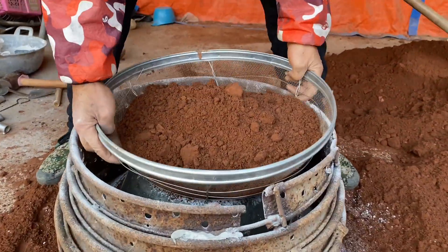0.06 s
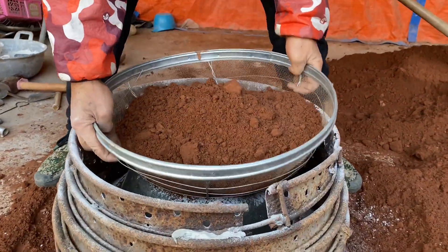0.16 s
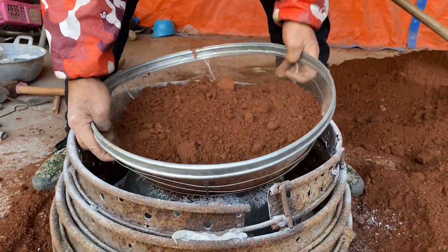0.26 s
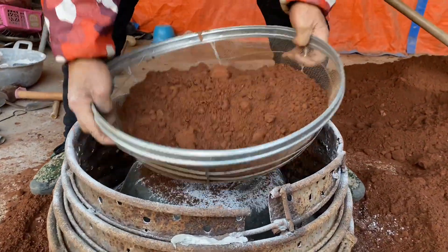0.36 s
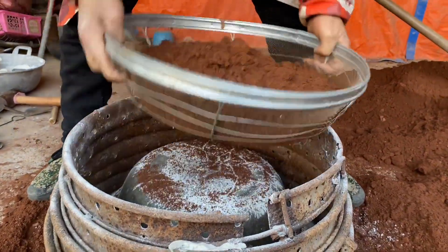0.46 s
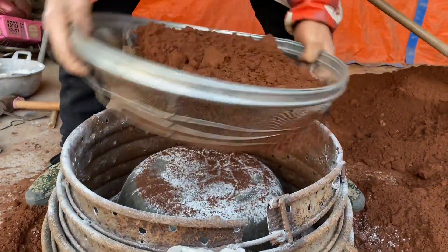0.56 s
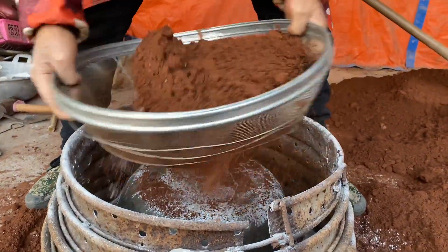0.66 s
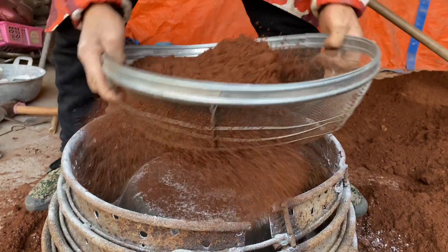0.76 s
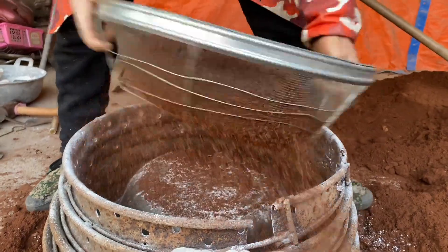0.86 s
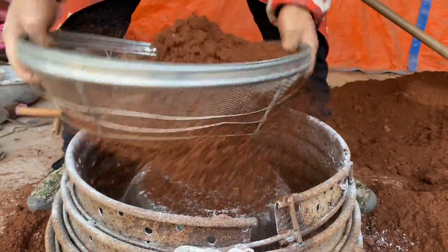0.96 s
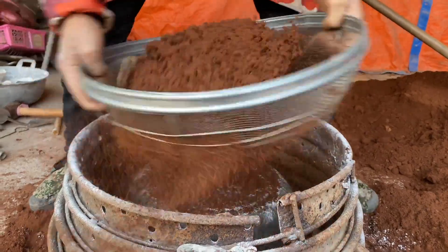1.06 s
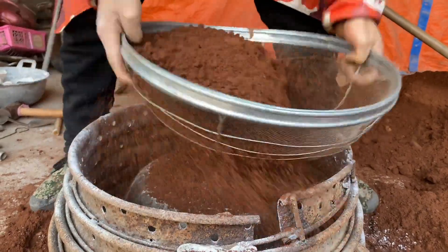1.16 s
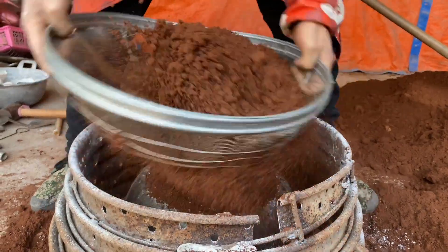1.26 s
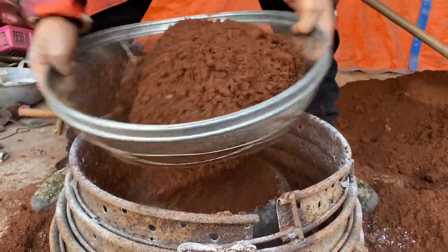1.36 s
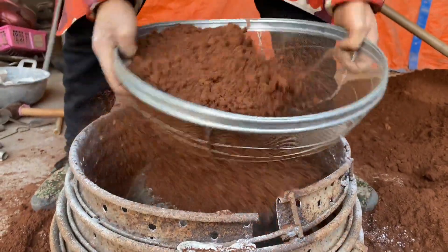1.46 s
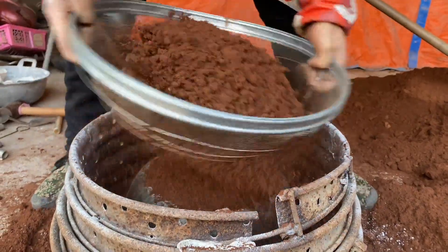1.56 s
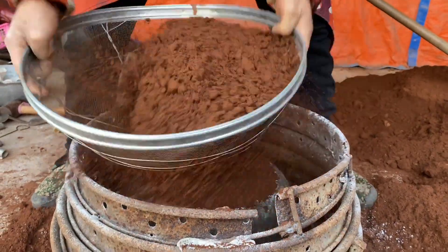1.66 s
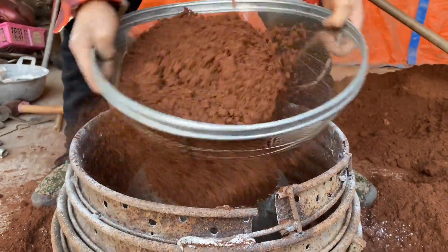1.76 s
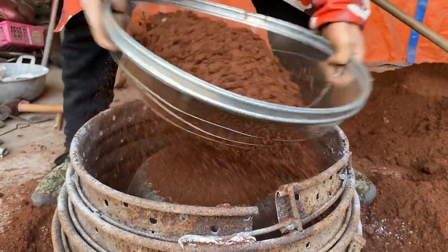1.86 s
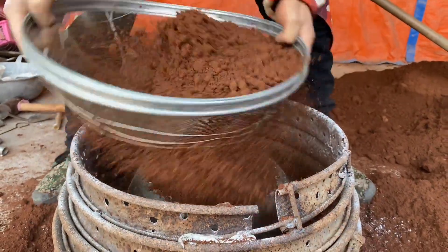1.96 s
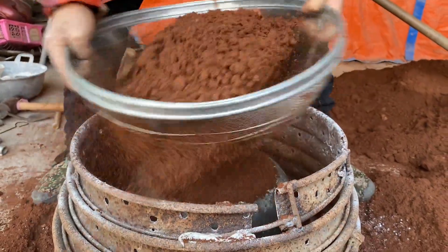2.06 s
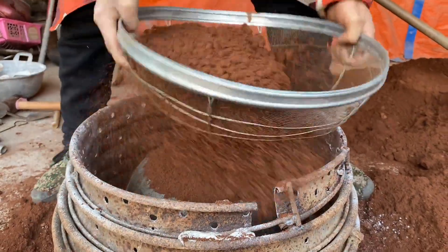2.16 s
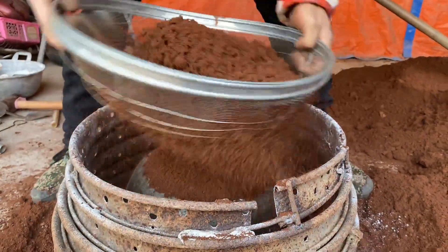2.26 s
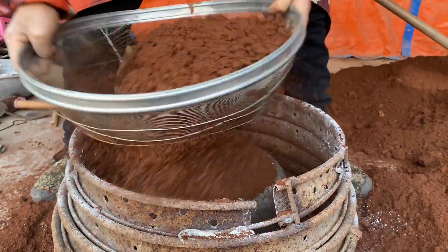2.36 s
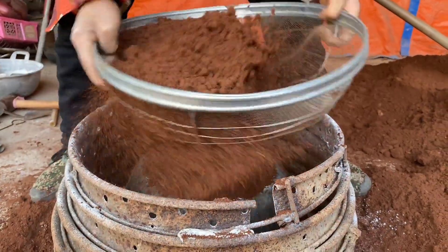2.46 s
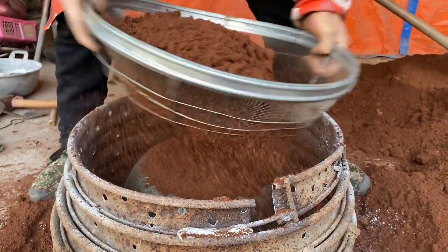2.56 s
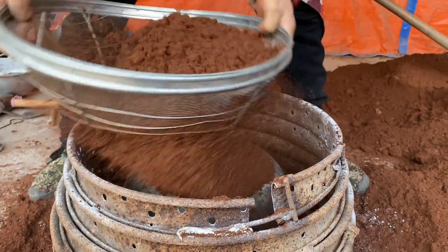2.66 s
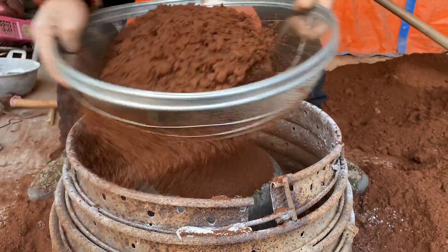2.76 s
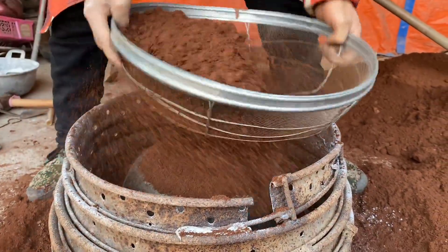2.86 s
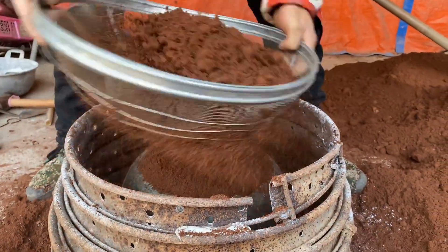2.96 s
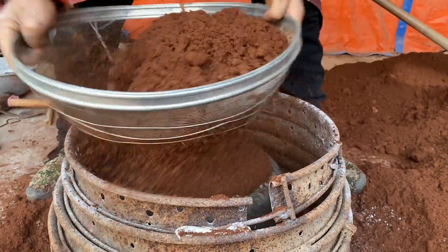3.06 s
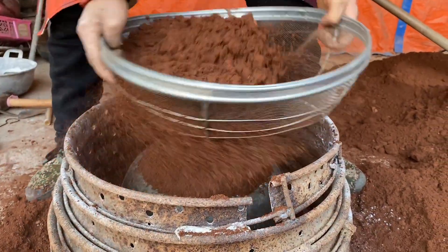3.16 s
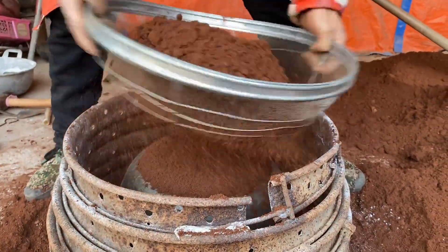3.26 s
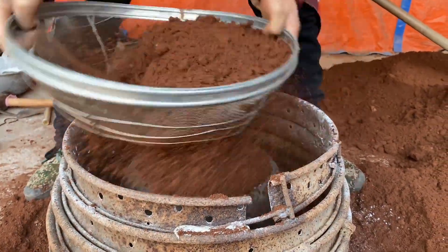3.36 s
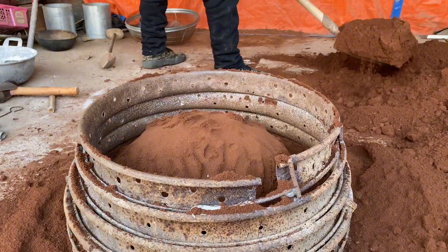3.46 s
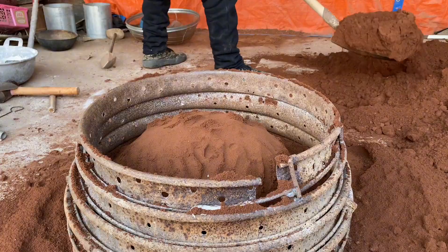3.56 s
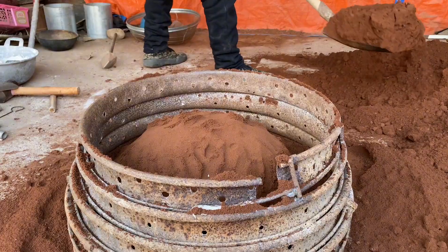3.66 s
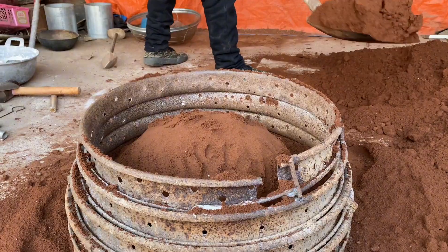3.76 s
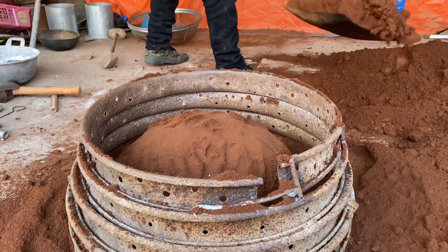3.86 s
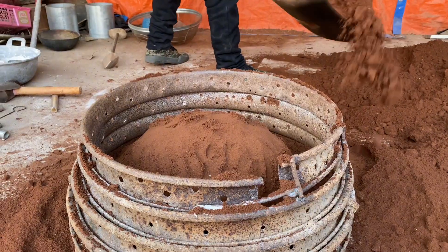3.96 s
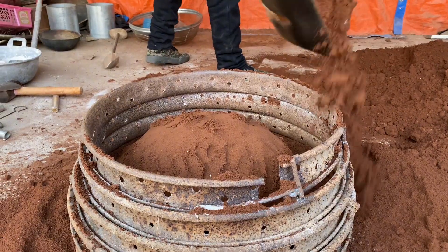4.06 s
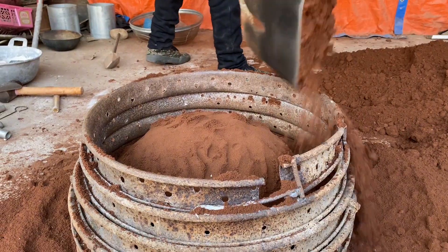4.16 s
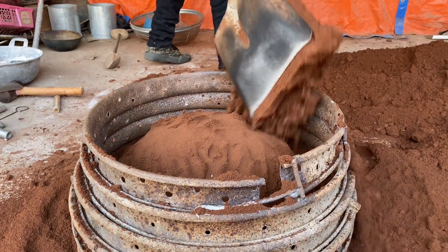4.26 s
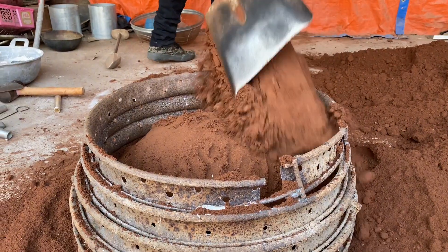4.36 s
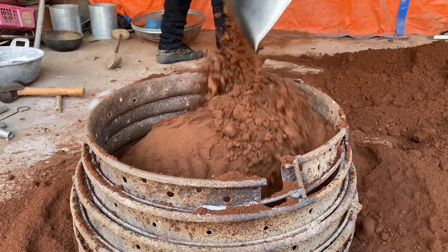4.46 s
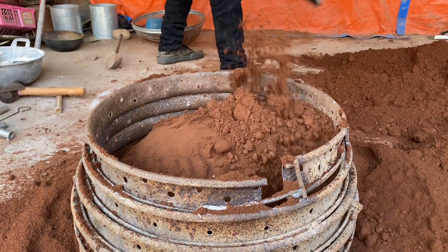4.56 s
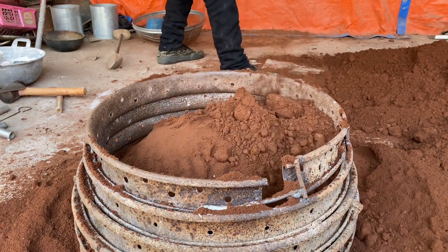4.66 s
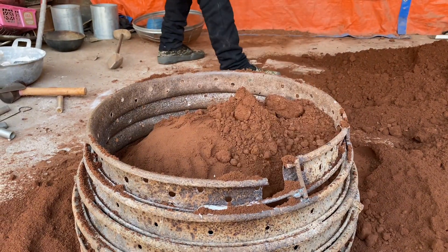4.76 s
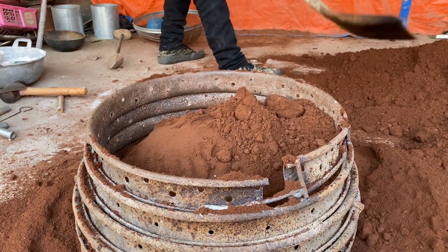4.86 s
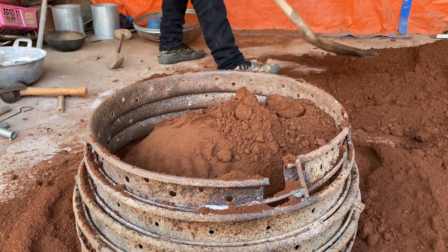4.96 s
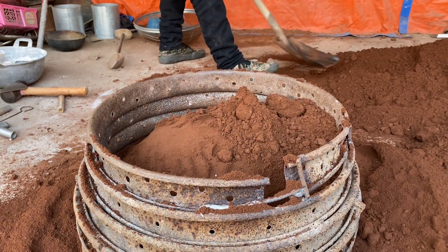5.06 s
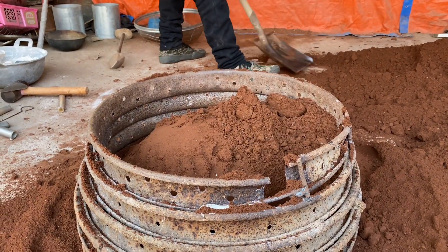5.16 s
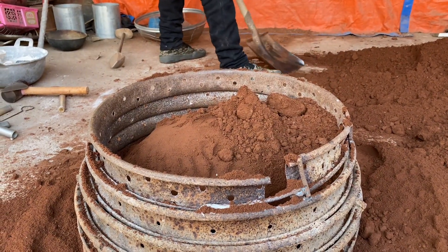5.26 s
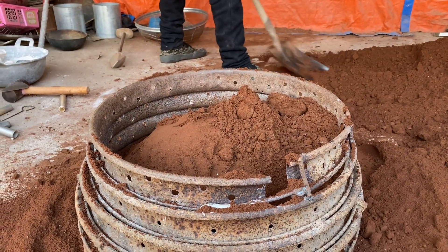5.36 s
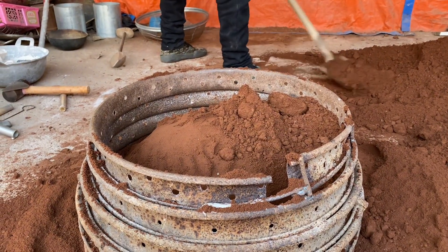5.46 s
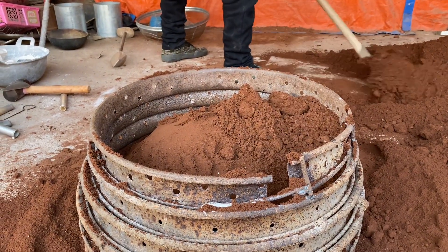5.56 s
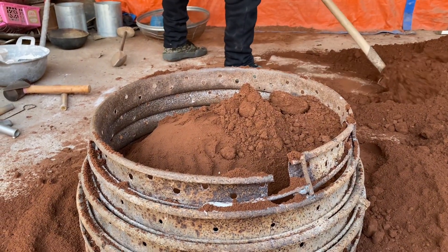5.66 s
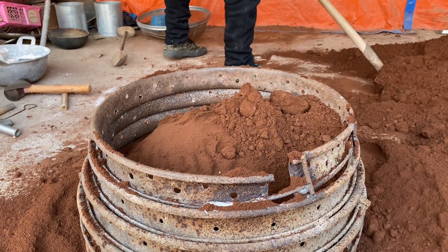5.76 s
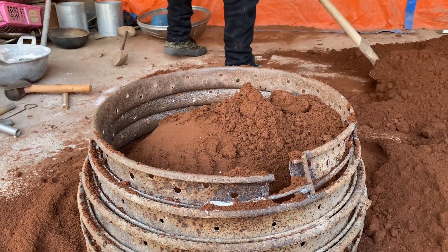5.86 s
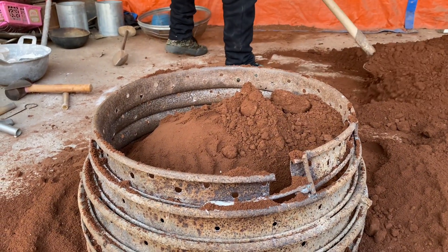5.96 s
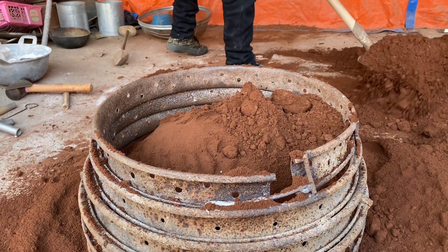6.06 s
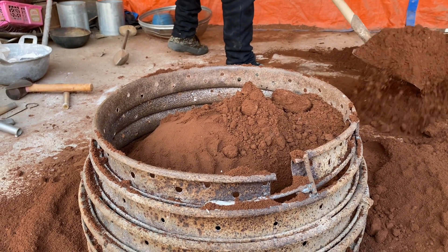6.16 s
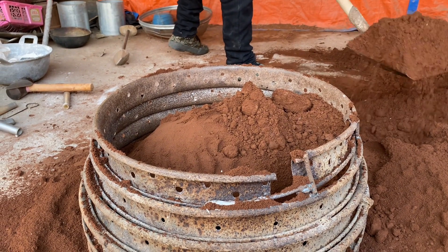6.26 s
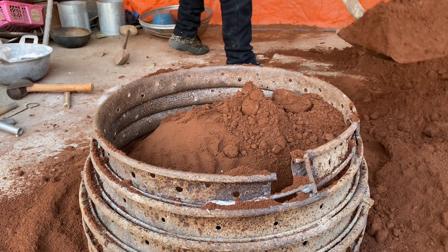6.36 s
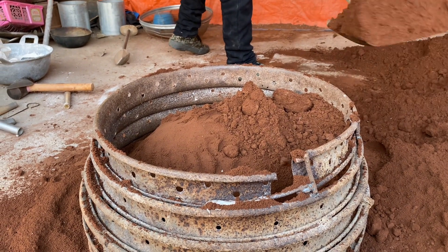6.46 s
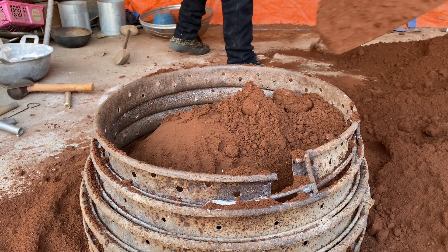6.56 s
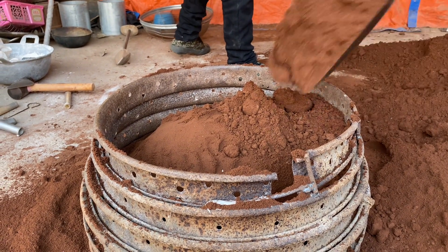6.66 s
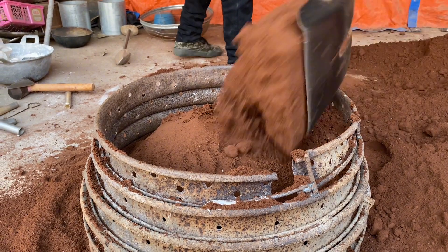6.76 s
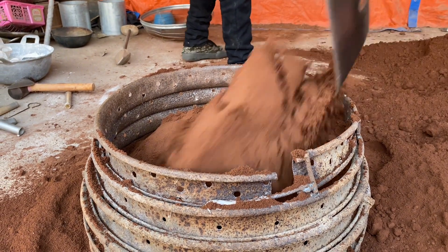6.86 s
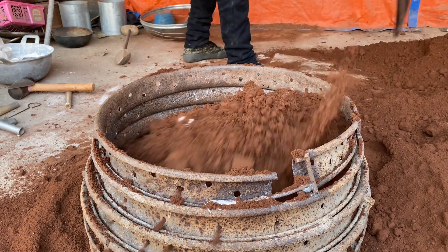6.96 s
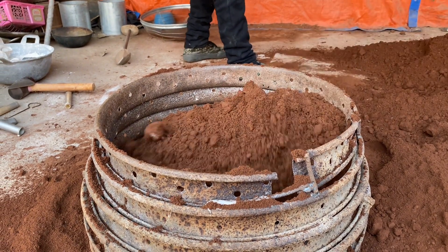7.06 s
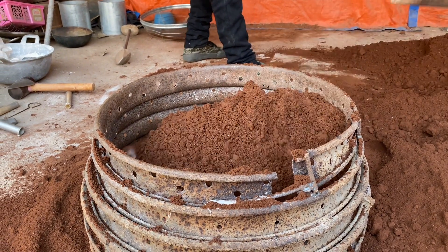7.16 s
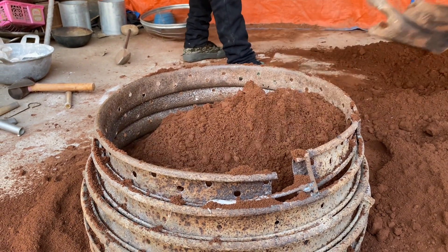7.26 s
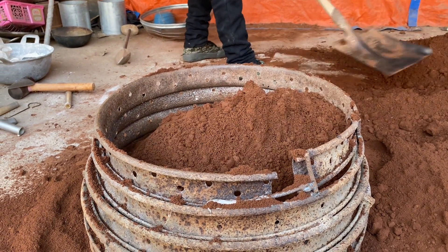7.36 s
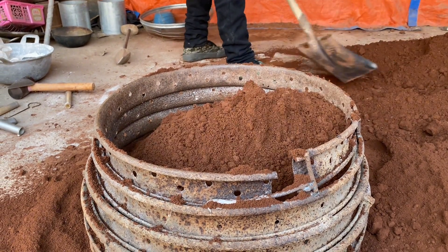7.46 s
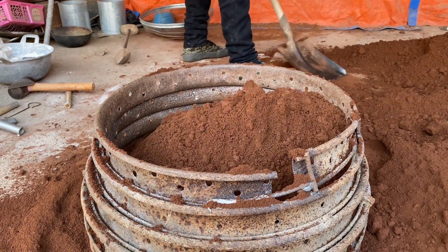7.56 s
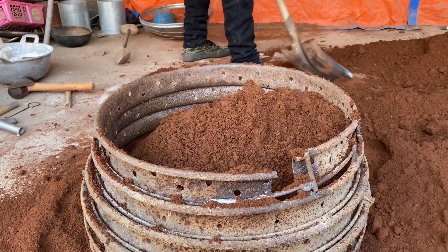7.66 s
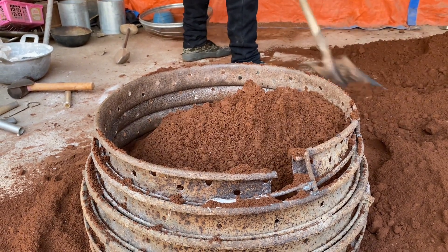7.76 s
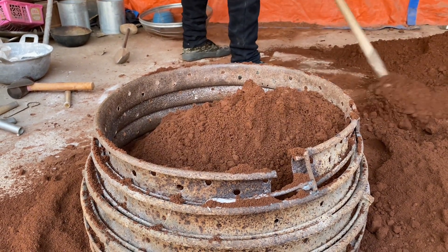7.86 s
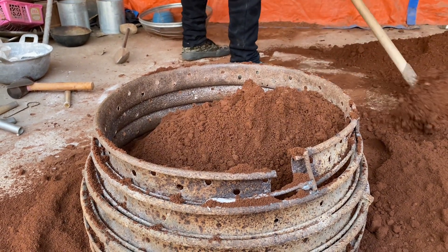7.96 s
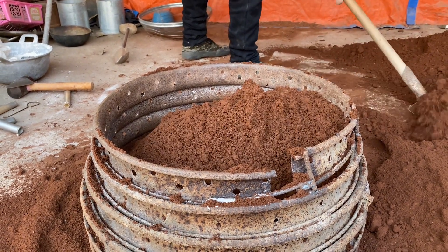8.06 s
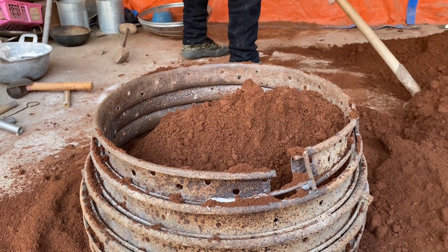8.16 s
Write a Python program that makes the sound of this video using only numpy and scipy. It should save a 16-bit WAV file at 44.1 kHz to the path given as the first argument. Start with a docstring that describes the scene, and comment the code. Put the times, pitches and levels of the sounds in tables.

```python
"""In a foundry yard, moulding sand is shaken through a wire sieve into a steel flask; the sound drops out briefly,
then a shovel tips two loads in and is driven twice into the heap. Grains hissing on mesh and blade are shaped
noise, clods tick as short sprays of noise and knock as fading tones, and a low rumble fills the yard.
Heard close by in stereo. Table levels are those before the gain in record()."""
import sys
import numpy as np
from scipy import signal
from scipy.fft import rfft, irfft, next_fast_len
from scipy.io import wavfile
from scipy.ndimage import uniform_filter1d

SR = 44100
rng = np.random.default_rng(int(sys.argv[2]) if len(sys.argv) > 2 else 0)


def digitize_waveform(pressure):
    """Quantize a signal to 16-bit integers and store it at the path in sys.argv[1].

    Rows of a 2-D input are taken as channels; values are limited to [-1, 1].
    """
    field = np.atleast_2d(pressure).T
    bounded = np.clip(field, -1, 1)
    quanta = np.round(bounded * 32767).astype(np.int16)
    wavfile.write(sys.argv[1], SR, quanta)


N = 362061
T = np.arange(N) / SR  # time of each sample, s
SIZE = next_fast_len(N)
HZ = np.arange(SIZE // 2 + 1) * SR / SIZE + 1e-3  # just above zero, so its logarithm exists

# The sieve is lifted and its load settles: grains on the mesh [t/s, level/dB]
SIEVE_LIFT = [(0, -54.5), (.12, -63), (.14, -55.5), (.27, -51), (.35, -49.5), (.39, -58.5), (.45, -50.5),
              (.53, -49.5), (.66, -44.5), (3.43, -45.5)]
# Jerks that throw the load [t/s, level/dB]
SIEVE_JOLTS = [(.552, -36.5), (.606, -34.5)]
JOLT_RISE_DB_S, JOLT_FALL_DB_S = 899.5, 249
# Each sweep of the arms [start t/s, peak level/dB, skew/1: under 1 peaks early]
ARM_STROKES = [(0.668, -32, 0.63), (0.848, -33.5, 0.69), (1.012, -31.5, 0.91), (1.175, -32.5, 1.),
               (1.342, -31.5, 1.01), (1.533, -32.5, 0.62), (1.708, -33.5, 0.48), (1.85, -33.5, 0.97),
               (2.03, -32, 0.84), (2.2, -32.5, 0.73), (2.373, -33.5, 0.75), (2.542, -31.5, 1.06),
               (2.712, -32.5, 0.96), (2.901, -31, 0.87), (3.067, -32.5, 0.87), (3.249, -31.5, 0.72)]
STROKE_S, STROKE_POINT = 0.16, 1.6  # length; above 1 the swell is more pointed
# Tone of grains on the mesh [f/Hz, level/dB per Hz]
MESH_TONE = [(1200, -34), (2200, -12), (3200, -3.5), (4300, 0), (6500, -4), (9000, -5.5), (11000, -4.5),
             (13000, -12), (15500, -12)]
# Ringing of the mesh wires [f/Hz, width/Hz, level/dB]
WIRE_MODES = [(3260, 67, -10), (4080, 77, 1), (4830, 520, -13), (4800, 1000, -8.5), (6700, 300, -6.5)]
# Sand landing in the flask [t/s, level/dB]
FLASK_LANDING = [(0.0, -52), (0.12, -76.5), (0.27, -58), (0.43, -59), (0.58, -65.5), (1.2, -61.5),
                 (3.43, -63)]
# Tone of that patter [f/Hz, level/dB per Hz]
PATTER_TONE = [(150, -13.5), (300, 2), (450, -6.5), (700, -2), (1000, -2.5), (1500, -1), (2400, -1.5)]


def sieve():
    """Grains roll over the mesh with each stroke and ring its wires; what falls through patters into the flask."""
    power = curves(SIEVE_LIFT)[0] ** 2
    for s, db in SIEVE_JOLTS:
        power += (undb(db) * rush(s, JOLT_RISE_DB_S, 0, JOLT_FALL_DB_S)) ** 2

    sweep = np.zeros(N)
    k = np.arange(int(STROKE_S * SR))
    for s, db, skew in ARM_STROKES:
        swell = np.sin(np.pi * (k / len(k)) ** skew) ** STROKE_POINT
        sweep[int(s * SR) + k] += (undb(db) * swell) ** 2

    roll = colour(grains(spread_db=2.26, flicker_db=0.93, rate=150), MESH_TONE)
    hiss = patchy(roll + undb(-2) * ring(roll, WIRE_MODES), depth_db=2.1, count=4)
    patter = colour(grains(spread_db=0.78, flicker_db=2.1, rate=60), PATTER_TONE)
    # each stroke shakes more sand through
    landing = curves(FLASK_LANDING)[0] + undb(-29.5) * np.sqrt(sweep)
    return np.sqrt(power + sweep) * hiss + landing * patter


# Tone of grit on the blade [f/Hz, level/dB per Hz]
GRIT_TONE = [(700, -30.5), (1200, -13), (1600, -5.5), (2200, -3), (4500, 0), (6500, -3.5), (8500, -8),
             (10000, -28.5)]
# Tone of the finest dust, also used for clods [f/Hz, level/dB per Hz]
DUST_TONE = [(7500, -25), (9000, -0.5), (11000, 0), (13000, -7), (15500, -9.5)]
# Duller rub of the blade, also the low part of clods [f/Hz, level/dB per Hz]
BODY_TONE = [(420, -25), (600, -4), (800, -2.5), (1300, -4.5), (1800, -14)]
# Ringing of the blade [f/Hz, width/Hz, level/dB]
BLADE_MODES = [(790, 55, 7.5), (890, 110, 0), (1020, 31, 3), (1232, 150, -2.5), (1943, 98, 1.5),
               (2166, 80, -1.5), (2427, 97, -1.5), (2890, 60, -3.5), (3260, 70, -15), (4460, 110, -8.5)]
# Sand striking the flask wall makes it ring [start t/s, length/s, level/dB]
FLASK_RINGS = [(4.03, .11, -57), (4.26, .14, -48), (4.41, .1, -59), (6.74, .11, -55), (6.9, .08, -59)]
# Ringing of the flask wall [f/Hz, width/Hz, level/dB]
FLASK_MODES = [(864, 11, 1), (1283, 34, 5.5), (1895, 37, 1.5), (2520, 13, 2), (2805, 9.3, 7), (3430, 14, 2)]
# Once the load is full, the moving sand's sound glides deeper [start t/s, load full t/s, centre f/Hz until full]
BLADE_LOADS = [(5.3, 5.5, 360), (7.723, 7.843, 525)]
LOADED_HZ, DEEPEN_S = 245, 0.13  # deep centre; time to glide down to it


def shovel():
    """Grit rubs the steel: a hiss with the upper modes and dust, the lower modes and the moving sand on their own."""
    grit, blade, bulk, dust = handling()
    rub = patchy(grains(spread_db=2.5, flicker_db=0.72, rate=91), depth_db=2.55, count=3)
    upper_modes = [mode for mode in BLADE_MODES if mode[0] > 1500]
    lower_modes = [mode for mode in BLADE_MODES if mode[0] < 1500]

    hiss = colour(rub, GRIT_TONE)
    hiss = unit(hiss + undb(3) * ring(hiss, upper_modes))

    # only a hard push makes the lower modes stand out of the dull rub
    push = np.clip(blade / undb(-42), 0, 1)
    ringing = unit(ring(rub, lower_modes))
    low = (push * ringing + 0.55 * colour(rub, BODY_TONE)) / (push + 0.55)

    wall = swells(FLASK_RINGS) * unit(ring(rub, FLASK_MODES))

    track = []
    for s, full, hz in BLADE_LOADS:
        track += [(s - 0.02, LOADED_HZ), (s, hz), (full, hz), (full + DEEPEN_S, LOADED_HZ)]
    sand = gliding(grains(spread_db=1.5, flicker_db=2.4, rate=40), track, octaves=0.63)
    return grit * hiss + dust * colour(rub, DUST_TONE) + blade * low + bulk * sand + wall


# The blade is driven into the heap, one list per thrust
# [t/s, grit hissing level/dB, blade ringing level/dB, bulk of sand shifting level/dB]
BLADE_THRUSTS = [
    [(5.288, -66, -84, -83), (5.308, -20, -38.5, -55.5), (5.355, -20, -28, -48), (5.45, -22.5, -37, -45),
     (5.48, -24, -27.5, -34.5), (5.525, -28, -34, -31.5), (5.73, -56, -58.5, -55), (5.83, -68, -72.5, -68),
     (5.93, -90, -79, -72)],
    [(7.714, -50.5, -51, -83), (7.729, -20, -24.5, -38), (7.772, -20.5, -28.5, -37), (7.805, -18, -20, -39),
     (7.88, -30, -39, -39), (7.98, -40, -45, -48.5), (8.094, -56.5, -65, -59)],
]
THRUST_DUST_DB, DUST_FADE = 2, 1.272  # dust against grit at 0 dB; by this power it dies faster than grit
# Sand slides off the blade or rustles nearby [peak t/s, rise/dB/s, hold/s, fall/dB/s, grit level/dB,
# then against the grit: blade level/dB, bulk level/dB, dust level/dB]
SAND_SLIDES = [(3.76, 110, 0.29, 60, -73.5, -8.5, 0, -2), (4.051, 596, 0.022, 113, -48.5, 0.5, -4, -10.5),
               (4.3, 180, 0.036, 120, -44.5, -8.5, -14.5, -5), (4.46, 60, 0.01, 135, -49.5, -5, -9, -11),
               (4.68, 61, 0.012, 250, -61, -9, -9, -8), (4.795, 149, .01, 84, -59.5, -6, -13.5, -9.5),
               (5.089, 90.5, 0.03, 30, -66, 0, -4.5, -9.5), (6.28, 1995, 0.0052, 300, -67, -3, -0.5, -28.5),
               (6.51, 250, .16, 50, -75, -20.5, -13, -7.5),
               (6.76, 245, 0.11, 101, -50.5, -8.5, -14.5, -1.5),
               (6.944, 200, .005, 187, -44.5, -7, -8, -6.5), (7.1, 200, 0.013, 55, -68, -3, -5, -9),
               (7.5, 70, .05, 60, -68.5, -3.5, -6, -10), (7.61, 150, 0.0092, 190, -57, -4, -12, -9),
               (7.7, 120, 0.012, 300, -61, -1, -11.5, -4), (8.113, 332, 0.0092, 236, -49, -1, -6, -16)]


def handling():
    """Gains of grit, blade, bulk and dust; thrusts and slides add up in power."""
    power = np.zeros((4, N))
    for table in BLADE_THRUSTS:
        grit, blade, bulk = curves(table)
        dust = undb(THRUST_DUST_DB) * grit ** DUST_FADE
        power += np.array([grit, blade, bulk, dust]) ** 2
    for s, rise_db_s, hold, fall_db_s, db, *parts_db in SAND_SLIDES:
        levels = undb(db + np.array([0, *parts_db]))
        power += (levels[:, None] * rush(s, rise_db_s, hold, fall_db_s)) ** 2
    return np.sqrt(power)


# Clods hitting mesh, rim and ground
# [t/s, peak level/dB, top treble level/dB against the body, low part level/dB against the body]
CLOD_TICKS = [(0.081, -41, -3, -27), (0.1342, -36, 1, -34), (0.1813, -40.5, -10.5, -12),
              (0.251, -34.6, -18, -15), (0.2632, -32, -17, -33), (0.2892, -33.5, -10, -8),
              (0.3398, -32.5, -3, -26), (0.5505, -23.5, -9, -34), (0.595, -17.5, -5.5, -45),
              (0.598, -11, -4.5, -29.5), (0.6316, -26, -18, -35), (1.3355, -27.5, -15, -27),
              (1.3623, -21.5, -7, -22.5), (1.6707, -27, -14, -30), (2.0062, -28, -6, -35),
              (2.0972, -26, -8, -30.5), (2.553, -23.5, 1, -30.5), (2.8692, -33, -1, -31),
              (3.2564, -30, 6, -37.5), (4.029, -38, -14, -3), (4.052, -35, -9, -7), (4.426, -42, -18, 10),
              (6.271, -40, -44, -17.5)]
# Smaller clods at random moments [from t/s, to t/s, count/1, mean peak level/dB]
CRUMB_SPELLS = [(.14, .35, 5, -39), (.7, 3.4, 8, -28)]
CRUMB_TOP_DB, CRUMB_LOW_DB = -32, -25  # against the body
# Tone of a clod's body [f/Hz, level/dB per Hz]
CLOD_TONE = [(1200, -24), (2400, -6.5), (4500, 7.5), (7000, -2), (9000, -16.5)]
TICK_S, BIG_TICK_S = 0.0027, 0.0078  # decay; added decay at full scale, as bigger clods spray longer


def ticks():
    """Each clod bursts at once into a short spray of grains: noise that starts sharply and dies away."""
    out = np.zeros((2, N))
    u = np.arange(SR // 20) / SR
    spray = rng.standard_normal((2, N))
    body, top, low = colour(spray, CLOD_TONE), colour(spray, DUST_TONE), colour(spray, BODY_TONE)

    crumbs = []
    for start, end, count, db in CRUMB_SPELLS:
        for at, size in rng.random((count, 2)):
            peak_db = db + 6 * (size - 0.5)
            crumbs.append((start + (end - start) * at, peak_db, CRUMB_TOP_DB, CRUMB_LOW_DB))

    for s, db, top_db, low_db in [*CLOD_TICKS, *crumbs]:
        k = slice(int(s * SR), int(s * SR) + len(u))
        shape = (1 - np.exp(-u / 0.00011)) * np.exp(-u / (TICK_S + BIG_TICK_S * undb(db)))
        burst = shape * (body[:, k] + undb(top_db) * top[:, k] + undb(low_db) * low[:, k])
        out[:, k] += undb(db) * burst / np.abs(burst).max(axis=1, keepdims=True)
    return out


# Dull knocks on flask and ground [t/s, peak level/dB, f/Hz, time to fade by 60 dB/s]
DULL_KNOCKS = [(0.535, -34.5, 66.6, 0.098), (0.297, -53.5, 566, 0.046), (3.481, -57, 580, 0.029),
               (3.508, -55.5, 540, 0.03), (3.62, -65, 564, 0.059), (4.295, -42, 190, 0.17),
               (4.72, -48.5, 800, 0.061), (6.272, -51, 387, 0.043)]


def knocks():
    """A soft blow into one damped mode: a sine that dies away."""
    out = np.zeros(N)
    u = np.arange(SR // 4) / SR
    for s, db, hz, t60 in DULL_KNOCKS:
        k = int(s * SR)
        fade = np.exp(-np.log(1000) * u / t60)
        out[k:k + len(u)] += undb(db) * np.sin(2 * np.pi * hz * u) * fade
    return out


# A faint narrow hiss comes and goes [start t/s, length/s, level/dB, centre f/Hz, width/Hz]
FAINT_WHISPS = [(0.265, 0.26, -61.5, 1450, 180), (1.95, 0.49, -62, 1350, 277),
                (4.976, 0.32, -64, 1610, 280), (5.016, 0.29, -67, 2060, 220),
                (7.096, 0.22, -67.5, 1450, 70)]


def whisps():
    """Narrow bands of noise that swell and fade."""
    noise = rng.standard_normal((2, N))
    out = np.zeros((2, N))
    for s, length, db, hz, width in FAINT_WHISPS:
        mode = [(hz, width, 0)]
        band = ring(ring(noise, mode), mode)  # twice for steeper sides
        out += swells([(s, length, db)]) * unit(band)
    return out


# Tone of the yard [f/Hz, level/dB per Hz]
YARD_TONE = [(20, -23), (35, -15), (58, 6), (90, -3.5), (125, -4), (200, -15.5), (300, -29.5), (450, -34),
             (1000, -41), (3200, -39), (6500, -47.5), (11000, -45.5), (15500, -54.5)]


def yard():
    """Low rumble and faint hiss: steady noise, wavering a little."""
    level = undb(-55 + 1.2 * walk(rate=7.8))
    return level * colour(rng.standard_normal((2, N)), YARD_TONE)


# Stereo image by frequency: how alike left and right are, their level difference and phase
# [f/Hz, likeness/0-1, left minus right level/dB, phase of right ahead of left/rad]
STEREO_IMAGE = [(60, .95, 3.5, -.1), (250, .9, 2.8, 0), (600, .68, 1.5, 0), (1500, .5, .6, -.4),
                (3200, .25, 4, -1.3), (5000, .2, 1, -3.5), (6900, .35, 0, -6.3), (8600, .45, .5, -3.8),
                (9200, .93, 0, -3.1), (15000, .93, 0, 6.3), (17000, .93, 0, 9.4)]


def stereo(pair):
    """Left hears the first stream; right a phase-shifted share of it plus the unrelated second."""
    hz, alike, pan_db, lead = np.transpose(STEREO_IMAGE)
    alike = np.interp(HZ, hz, np.clip(alike, 0, 1))
    pan_db = np.interp(HZ, hz, pan_db)
    lead = np.interp(HZ, hz, lead)
    first, second = rfft(pair, SIZE)
    right = alike * first * np.exp(1j * lead) + np.sqrt(1 - alike ** 2) * second
    return irfft([first * undb(pan_db / 2), right * undb(-pan_db / 2)], SIZE)[:, :N]


def undb(db):
    """Decibels to an amplitude factor."""
    return 10 ** (np.asarray(db) / 20)


def unit(x):
    """Scale to an average (RMS) strength of 1."""
    return x / np.sqrt(np.mean(x ** 2))


def curves(table):
    """Columns of a time table as gains per sample, silent outside its span."""
    s, *columns = np.transpose(table)
    return np.array([undb(np.interp(T, s, c, left=-200, right=-200)) for c in columns])


def colour(x, points):
    """Shape a spectrum along (Hz, dB) points."""
    hz, db = np.transpose(points)
    gain = undb(np.interp(np.log(HZ), np.log(hz), db, left=-90, right=-90))
    return unit(irfft(rfft(x, SIZE) * gain, SIZE)[..., :N])


def ring(x, modes):
    """Sum of resonances, each peaking at its own level at its centre."""
    return sum(undb(db) * signal.lfilter(*signal.iirpeak(hz, hz / width, SR), x) for hz, width, db in modes)


def walk(rate):
    """Random levels, rate new ones a second, joined by ramps; spread near 1."""
    k = int(SR / rate)
    steps = np.repeat(rng.standard_normal(N // k + 1), k)
    return unit(uniform_filter1d(steps, k)[:N])


def grains(spread_db, flicker_db, rate):
    """Two unrelated streams of dense impacts of mixed size, whose flow flickers together."""
    mix = np.minimum(rng.exponential(size=N), 4)
    size = undb(spread_db * mix + flicker_db * walk(rate))
    return size * rng.standard_normal((2, N))


def patchy(x, depth_db, count):
    """Resonances come and go as the load shifts: gain wanders in patches of count steps by count bins."""
    spec = signal.stft(x, nperseg=512)[2]
    field = rng.standard_normal(spec.shape[1:])
    field = uniform_filter1d(field, size=count, axis=0)
    field = unit(uniform_filter1d(field, size=count, axis=1))
    return unit(signal.istft(spec * undb(depth_db * field), nperseg=512)[1][:, :N])


def swells(rows):
    """Gains that rise and fall over (start, length, dB) spans."""
    return sum(undb(db) * np.sin(np.pi * np.clip((T - s) / length, 0, 1)) for s, length, db in rows)


def gliding(x, track, octaves):
    """A band whose centre follows (s, Hz) points; before the first it rests at the last."""
    hz, s, spec = signal.stft(x, SR, nperseg=1024)
    at, centre = np.transpose(track)
    away = np.log2((hz[:, None] + 1) / np.interp(s, at, centre, left=centre[-1]))
    band = np.exp(-0.5 * (away / octaves) ** 2)
    return unit(signal.istft(spec * band, nperseg=1024)[1][:, :N])


def rush(s, rise_db_s, hold, fall_db_s):
    """Gain that climbs to 1 at s, holds and dies away."""
    return undb(rise_db_s * np.minimum(T - s, 0) - fall_db_s * np.maximum(T - s - hold, 0))


def scene():
    """All sources together, spread in stereo."""
    return stereo(sieve() + shovel() + ticks() + knocks() + whisps() + yard())


# Moments of the dropout: fade starts, fade steepens, lowest point, sound back [t/s]
DROPOUT_S = (3.43, 3.446, 3.475, 3.476)
TOP_HZ = 15550


def record(dry):
    """The sound drops out briefly; the loudest peaks are rounded and the top is cut off."""
    dip_db = np.interp(T, DROPOUT_S, [0, -11.5, -45.5, 0])
    rounded = np.tanh(dry * undb(2 + dip_db))  # 2 dB of gain outside the dropout
    low_pass = signal.ellip(10, 0.2, 80, TOP_HZ, fs=SR, output="sos")
    return signal.sosfilt(low_pass, rounded)


dry = scene()
out = record(dry)
digitize_waveform(out)
```